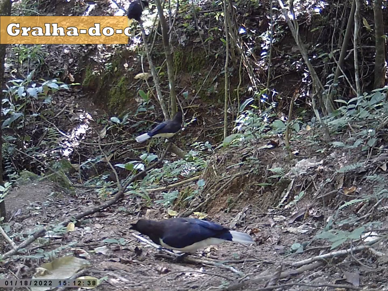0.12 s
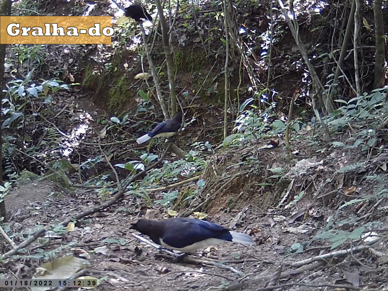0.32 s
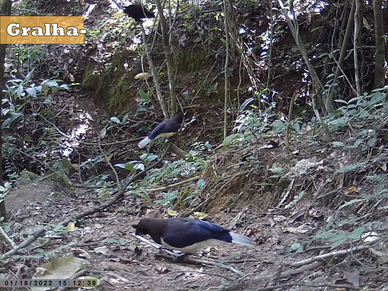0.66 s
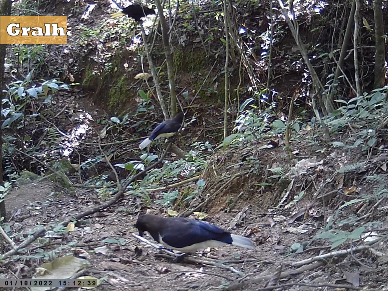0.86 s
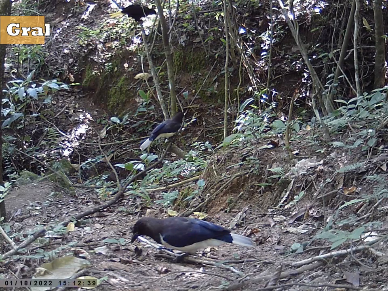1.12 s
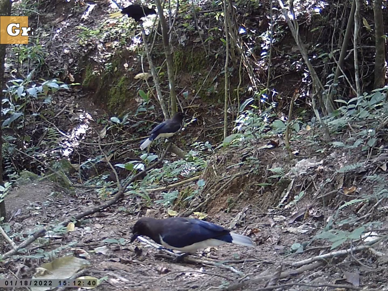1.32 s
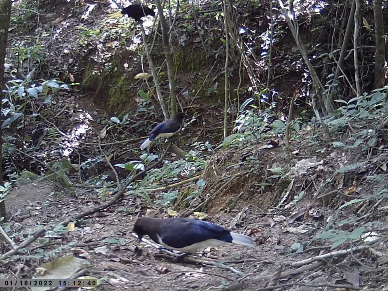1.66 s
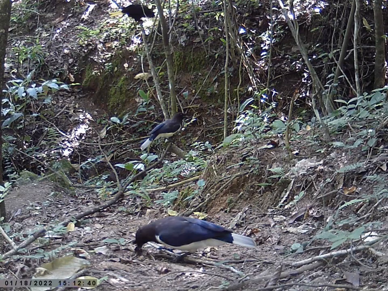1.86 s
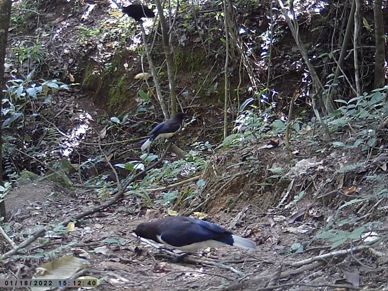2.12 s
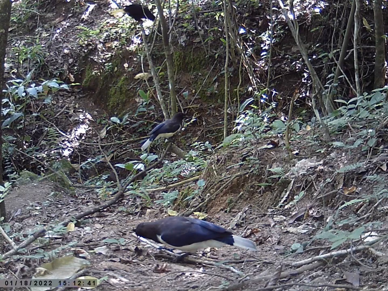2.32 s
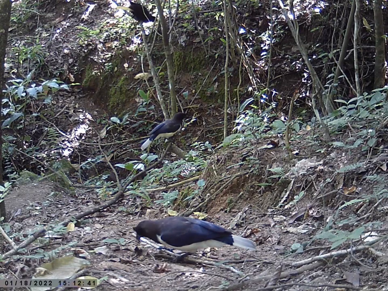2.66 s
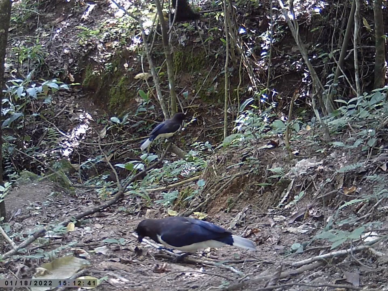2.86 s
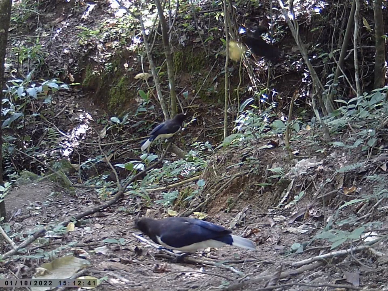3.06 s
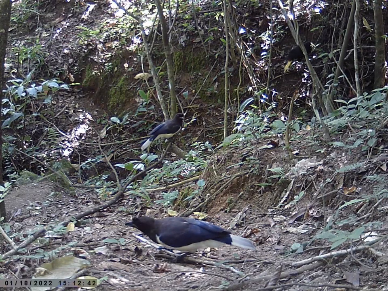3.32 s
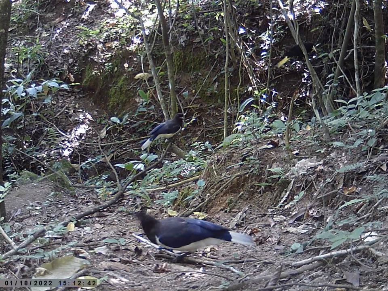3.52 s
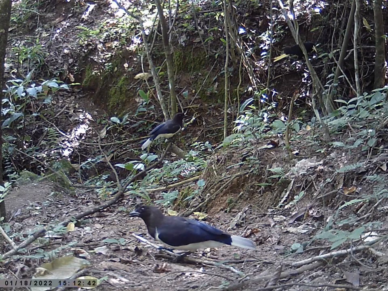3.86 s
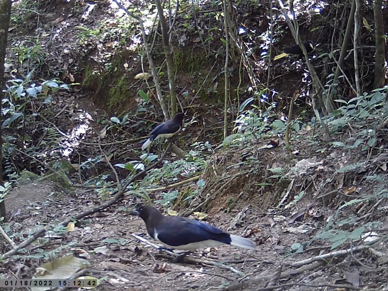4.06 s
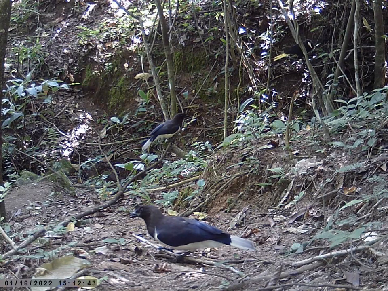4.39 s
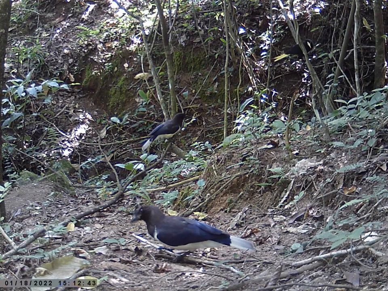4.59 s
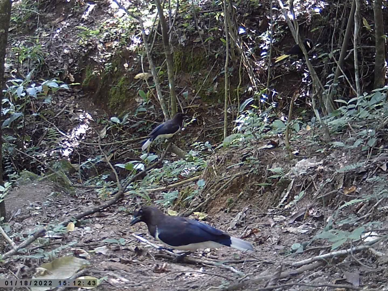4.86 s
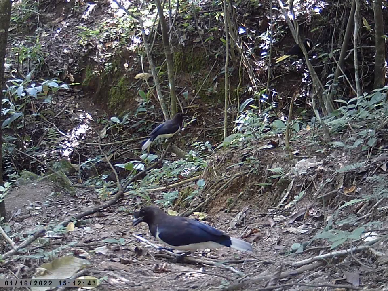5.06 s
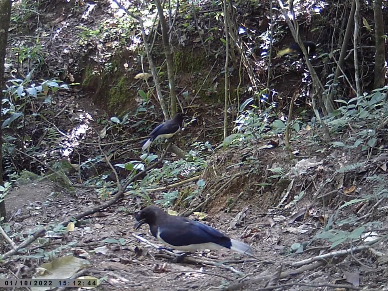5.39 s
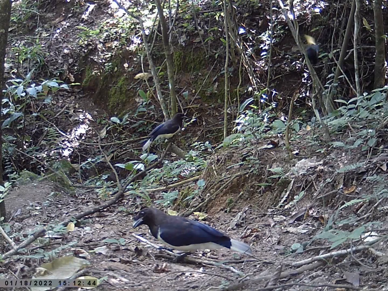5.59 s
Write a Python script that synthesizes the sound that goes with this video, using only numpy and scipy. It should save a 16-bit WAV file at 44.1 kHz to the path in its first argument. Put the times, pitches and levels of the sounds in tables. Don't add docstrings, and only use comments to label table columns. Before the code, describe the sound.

In a quiet wood, a jay faintly rustles dry leaves while distant birds chirp and rasp over a thin insect trill. At about three seconds another bird takes off and flaps past, its feathery swishes and soft thumps growing strongest just after four seconds. Its draught then buffets the small camera microphone with low rumbling bumps, while a few twigs tick near the end.

```python
import sys
import numpy as np
from scipy import signal
from scipy.fft import rfft, irfft, next_fast_len
from scipy.io import wavfile
from scipy.ndimage import uniform_filter1d

SR = 44100
rng = np.random.default_rng(int(sys.argv[2]) if len(sys.argv) > 2 else 0)


def pcm_store(signal):
    levels = np.round(np.clip(np.atleast_2d(signal), -1, 1) * 32767)
    wavfile.write(sys.argv[1], SR, levels.astype(np.int16).T)


def volts_from_decibels(level):
    exponent = np.asarray(level, float) / 20
    return 10 ** exponent


N = 251810


def unit(x):
    return x / np.sqrt(np.mean(x ** 2))


def shaped(x, gain):
    size = next_fast_len(len(x))
    hz = np.arange(size // 2 + 1) * SR / size + 1e-3
    return irfft(rfft(x, size) * gain(hz), size)[:len(x)]


def hump(hz, width):
    return lambda f: 1 / (1 + ((f * f - hz * hz) / (f * width)) ** 2)


def walk(rate, size=N):
    hold = max(int(SR / rate), 16)
    levels = rng.standard_normal(size // 16 + 1)[:size // hold + 1]
    return unit(uniform_filter1d(np.repeat(levels, hold), hold)[:size])


def even(x, span):
    power = uniform_filter1d(x ** 2, int(span * SR))
    return x / np.sqrt(power + .05 * np.mean(x ** 2))


def add(out, s, x):
    i = int(s * SR)
    out[i:i + len(x)] += x[:len(out) - i]


def curve(table):
    return np.interp(np.arange(N) / SR, *np.transpose(table), left=-120)


def puff(gain, rise, length, crackle_db, size=8192):
    t = np.arange(size) / SR
    swell = (1 - np.exp(-t / rise)) * np.exp(-(t / length) ** 1.3)
    grains = rng.standard_normal(size) * volts_from_decibels(crackle_db * walk(700, size=size))
    return unit(shaped(grains, gain) * swell) * np.sqrt(np.mean(swell ** 2))


# centre_hz [Hz], width_hz [Hz], level_db [dB]
FEATHER_BANDS = [(6800, 3100, 1), (8900, 8100, -6), (3500, 4500, -2)]


def feathers(f):
    return sum(volts_from_decibels(db) * hump(hz, width)(f) for hz, width, db in FEATHER_BANDS)


# start_s [s], swish_peak_db [dB], thump_db [dB re swish], thump_hz [Hz], swish_length_s [s]
HARD_STROKES = [
    (3.223, -36.5, -18, 334, 0.023),
    (3.304, -40, -28, 425, 0.015),
    (3.5705, -31.5, -9.5, 764, 0.018),
    (3.651, -36, -8.5, 434, 0.042),
    (3.7064, -40, -25, 323, .014),
    (3.927, -34, -6.5, 347, 0.026),
    (4.0135, -31.5, -5, 425, .028),
    (4.0961, -28.5, -3.5, 554, .026),
    (4.19, -35.5, -2.5, 315, .033),
]
SOFT_STROKES = [
    (2.9352, -33.5, -19, 455, 0.015),
    (3.0019, -37.5, -27, 428, 0.076),
    (3.1193, -36.5, -16, 616, 0.016),
    (3.3693, -36, -5, 308, .025),
    (3.4767, -36, -21, 420, .026),
    (4.2494, -42, -2.5, 690, 0.028),
    (4.2984, -41.5, -4.5, 324, 0.029),
    (4.4052, -36, -14, 473, 0.031),
    (4.4974, -33.5, -8.5, 700, .02),
]
SNAP_DB, SOFT_SNAP_DB = -8, -10.5
SNAP_HZ = 1940
WASH_HZ, WASH_DB = 189, -4.5


def strokes(table, rise, snap_db):
    out = np.zeros(N)
    for s, db, thump_db, thump_hz, length in table:
        swish = puff(feathers, rise, length, 2.6)
        snap = puff(hump(SNAP_HZ, 2300), rise, 0.69 * length, 3)
        thump = puff(hump(thump_hz, 440), rise + 0.00065, 0.58 * length, 0.61)
        wash = puff(hump(WASH_HZ, 207), 0.0041, length, .5)
        add(out, s, volts_from_decibels(db - 13.5) * swish)
        add(out, s, volts_from_decibels(db + snap_db - 9.5) * snap)
        add(out, s, volts_from_decibels(db + thump_db - 5.5) * thump)
        add(out, s, volts_from_decibels(db + thump_db + WASH_DB - 6.0) * wash)
    return out


# time_s [s], level_db [dB]
NEARNESS = [(2.8, -82), (2.86, -65), (3.03, -59.5), (3.29, -65), (3.39, -55), (3.43, -61), (3.5, -53),
            (3.64, -53), (3.73, -61.5),
            (3.87, -64), (3.93, -52.5), (4.08, -50.5), (4.15, -56), (4.62, -61.5), (4.7, -58), (5.27, -62),
        (5.32, -68.5), (5.5, -63)]
BODY_DB, BODY_PER_DB = -3, 0.27
GONE_S, WAKE_GRAIN = 4.56, .35


def glide():
    db = curve(NEARNESS)
    low_db = BODY_DB + BODY_PER_DB * (db + 60.5)
    near = np.where(np.arange(N) < GONE_S * SR, 1, WAKE_GRAIN)
    grain_db = near * (3.0 * walk(500) + 2.17 * walk(45))
    grains = rng.standard_normal((2, N)) * volts_from_decibels(grain_db)
    unzips = rng.random(N) < 120 / SR
    barbs = unzips * rng.standard_normal(N) * volts_from_decibels(11.5) * near
    high = unit(shaped(grains[0] + barbs, feathers))
    low = unit(shaped(grains[1], hump(520, 3200)))
    return volts_from_decibels(db - 2.0) * (high + volts_from_decibels(low_db - 2) * low)


# time_s [s], level_db [dB]
CALM = [(0, -62), (.8, -60), (1.3, -63.5), (1.75, -59.5), (2.3, -62.5), (2.9, -60.5), (3.12, -54),
        (3.3, -62)]
# peak_s [s], level_db [dB], build_s [s], fast_eddies_db [dB re level]
GUSTS = [(3.385, -46.5, 0.038, -1), (3.62, -36.5, 0.098, -9.5), (3.93, -39.5, 0.022, -5),
         (4.08, -27.5, 0.12, -14.5), (4.18, -32, 0.044, -12), (4.28, -34.5, 0.058, -9),
         (4.511, -33.5, 0.11, -30), (4.74, -26.5, 0.038, -6), (4.84, -29.5, 0.053, -1),
         (4.93, -32.5, 0.073, 1), (5.159, -32, 0.074, -11.5), (5.44, -31, 0.034, -25),
         (5.56, -39, .06, -22.5), (5.7, -42.5, 0.035, -25)]
GUST_FALL_SHARE = 0.73


def gusts():
    t = np.arange(N) / SR
    slow = volts_from_decibels(curve(CALM))
    fast = slow * volts_from_decibels(-0.8)
    for s, db, build, fast_db in GUSTS:
        rise_or_fall = np.minimum((t - s) / build, (s - t) / (GUST_FALL_SHARE * build))
        swell = volts_from_decibels(db) * np.exp(rise_or_fall)
        slow = np.hypot(slow, swell)
        fast = np.hypot(fast, swell * volts_from_decibels(fast_db))
    return slow, fast


# centre_s [s], peak_db [dB], pitch_hz [Hz], push [1 push, -1 pull]
EDDIES = [(4.07, -20, 31.8, -1), (4.159, -22, 45.6, -1), (4.268, -29.5, 39, -1), (4.518, -32, 34.6, 1),
          (4.718, -13, 40.3, 1), (4.732, -23.5, 60, -1), (4.738, -20.5, 128, 1), (4.75, -10.5, 59.4, 1),
          (4.774, -20.5, 25, -1), (4.817, -21, 50, 1), (4.887, -21.5, 69, -1), (4.901, -18.5, 70, -1),
          (4.934, -23, 100, -1), (4.966, -23.5, 68.5, 1), (5.119, -28, 61, -1), (5.151, -21, 75, -1),
          (5.173, -25.5, 44.5, -1), (5.435, -25, 50, 1), (5.449, -27, 48, -1)]


def draught():
    slow_gain, fast_gain = gusts()
    slow, fast = rng.standard_normal((2, N))
    out = volts_from_decibels(1.0) * slow_gain * even(shaped(slow, hump(15.3, 22.3)), 0.125)
    out += volts_from_decibels(-5.5) * fast_gain * even(shaped(fast, lambda f: hump(78, 95)(f) ** 1.69), 0.062)
    for s, peak_db, hz, push in EDDIES:
        u = 2.0 * hz * np.arange(-4096, 4096) / SR
        vortex = (1 - 3 * u ** 2) / (1 + u ** 2) ** 3
        add(out, s - 4096 / SR, np.sign(push) * volts_from_decibels(peak_db) * vortex)
    return out


# start_s [s], rms_db [dB], centre_hz [Hz], length_s [s]
RUSTLES = [(.081, -61.5, 6400, .03), (.251, -63.5, 5440, 0.12), (.279, -59.5, 5170, .035),
           (.373, -60, 4800, .025), (.515, -57, 6400, 0.033), (.525, -62, 3180, 0.026),
           (.622, -59, 6200, 0.03), (.667, -63.5, 5470, 0.048), (1.026, -62, 9000, .015),
           (1.095, -62, 6800, .018), (1.42, -63, 6500, .013), (1.723, -60, 6300, 0.03),
           (1.929, -59, 3870, 0.025), (2.225, -66, 5000, .01), (4.902, -60.5, 3500, 0.015),
           (4.991, -65, 2800, 0.024)]
BRUSHES = [(2.876, -54, 3120, 0.015), (2.885, -60, 7000, .015), (3.033, -48.5, 6700, .01),
           (3.447, -54.5, 6960, .01), (3.6, -54, 7440, 0.032), (3.657, -54.5, 1500, 0.01),
           (3.815, -60, 5050, 0.013), (3.893, -54.5, 7500, 0.012), (3.948, -52.5, 7400, .032),
           (3.987, -51.5, 7360, .017), (4.033, -48.5, 7000, 0.027), (4.07, -54, 7000, 0.013),
           (4.156, -53.5, 7000, 0.018)]
# start_s [s], rms_db [dB], centre_hz [Hz]
TICKS = [(.182, -61, 6500), (2.832, -54, 3560), (2.9, -62, 3500), (2.982, -59, 2200), (3.213, -54, 5000),
         (3.2256, -49, 4500), (3.234, -56, 7000), (3.304, -51, 9000), (3.315, -62, 5000), (3.46, -60, 7550),
         (4.713, -57, 6040), (5.052, -52, 6900), (5.069, -50.5, 7700), (5.455, -58, 6000),
         (5.269, -55, 6100), (5.5475, -52, 6700), (5.565, -65, 7500), (5.6, -47.5, 6840),
         (5.615, -48.5, 6500)]
# start_s [s], rms_db [dB], centre_hz [Hz]
QUILLS = [
    (3.2282, -39, 6900),
    (3.5728, -44, 2580),
    (3.66, -48, 4000),
    (3.9365, -47, 3500),
    (4.0239, -46, 3000),
    (4.1105, -43, 3000),
    (4.507, -53, 3000),
]
TICK_S, QUILL_S = 0.0049, 0.0019
LEAF_CRACKLE_DB, BRUSH_CRACKLE_DB, TICK_CRACKLE_DB = 3, 2, 5.5
SPREAD = 0.72


def leaves(table, crackle_db):
    out = np.zeros(N)
    for s, db, hz, length in table:
        crackle = puff(hump(hz, SPREAD * hz), .13 * length, length, crackle_db)
        add(out, s, volts_from_decibels(db + 3.5) * crackle)
    return out


# start_s [s], length_s [s], start_hz [Hz], end_hz [Hz], rms_db [dB]
WHISTLES = [(.28, 0.042, 3350, 3500, -68), (.275, .024, 2940, 2760, -67), (.355, 0.065, 2750, 2480, -68),
            (.44, .07, 2470, 2250, -78), (.793, 0.046, 3110, 3045, -66), (.83, .065, 3070, 2720, -66),
            (1.42, 0.042, 3170, 2840, -72), (1.615, .018, 5070, 4800, -67), (1.665, .045, 4600, 3900, -75),
            (1.975, 0.1, 2650, 2600, -66), (2.089, .071, 2580, 2480, -68.5),
            (2.173, .022, 2590, 2540, -68.5), (5.125, .03, 3700, 2730, -68), (5.092, .02, 3680, 3000, -70),
            (5.183, .027, 3950, 3100, -68), (5.035, .042, 4810, 2750, -64), (5.25, .035, 2680, 2660, -66.5)]
SWOOPS = [
    (.078, .054, 3090, 3295, -65),
    (.075, .05, 4320, 4600, -66.5),
    (.235, .039, 7260, 7500, -63.5),
    (.475, .04, 4520, 3740, -71),
    (.876, .145, 4900, 3700, -68.5),
    (1.252, .15, 6100, 3550, -70),
]
RASPS = [(.27, .07, 5400, 5200, -59.5), (.25, .07, 5700, 5650, -65), (.3, .06, 4900, 4700, -65),
         (.47, .11, 5000, 4750, -77), (.22, 0.072, 4600, 5000, -66), (.615, .06, 6400, 5400, -65),
         (.885, .077, 2800, 2250, -68), (3.0, 0.032, 6320, 7360, -55), (3.01, .038, 8400, 8500, -60),
         (3.02, .043, 1700, 1454, -64.5), (.87, .11, 2960, 2600, -73), (4.24, 0.044, 726, 595, -58.5),
         (4.955, .08, 6100, 6000, -62)]
RASP_SWOOPS = [
    (.235, .12, 5100, 6300, -63),
    (4.255, 0.16, 4990, 2856, -61),
    (4.58, .23, 5100, 2800, -62.5),
]
SLUR_BEND, SWOOP_BEND, RASP_BEND = 1.05, 3.3, 2.4
SWOOP_FADE_DB = -5


def birds(notes, wobble, flutter_db, bend, fade_db=0):
    out = np.zeros(N)
    for s, length, start_hz, end_hz, db in notes:
        u = np.linspace(0, 1, int(length * SR))
        pitch = walk(300, size=12000)[:len(u)]
        level = walk(70, size=12000)[:len(u)]
        left = (1 - u) ** bend
        hz = (end_hz + (start_hz - end_hz) * left) * (1 + wobble * pitch)
        swell = np.sin(np.pi * u) ** .35 * volts_from_decibels(db + fade_db * u + flutter_db * level)
        add(out, s, swell * np.sin(2 * np.pi * np.cumsum(hz) / SR))
    return out


# pitch_hz [Hz], ring_s [s], pulse_rate_hz [pulses a second], rms_db [dB], singers [count]
INSECTS = [
    (6560, 0.036, 48.5, -71, 2),
    (6850, 0.042, 20, -90, 2),
    (6540, 0.0055, 93, -93, 2),
    (8560, 0.0028, 59, -72.5, 3),
    (9065, 0.012, 55, -73.5, 2),
]
# time_s [s], level_db [dB]
CHORUS = [(0, -72.5), (.57, -70.5), (1.14, -73), (2.81, -71.5), (3.56, -70.5), (4.07, -67), (4.2, -69),
          (5.06, -67), (5.3, -70)]


def insects():
    out, t = 0, np.arange(N) / SR
    swell_db = curve(CHORUS)
    swell_db = swell_db - np.median(swell_db)
    for hz, ring, rate, db, singers in INSECTS:
        choir = 0
        for k in range(int(round(singers))):
            pulse_hz = rate * (1 + 0.0123 * k + 0.00894 * walk(2.48))
            beat = np.cumsum(pulse_hz) / SR + rng.random()
            gate = np.exp(0.37 * np.cos(2 * np.pi * beat)) * volts_from_decibels(2.1 * walk(5.4))
            tone = np.sin(2 * np.pi * hz * (1 + .004 * k) * t + 1.3 * walk(40))
            scrape = unit(shaped(rng.standard_normal(N), hump(hz, 3.0 / ring)))
            choir = choir + gate * (tone + scrape)
        out = out + volts_from_decibels(db + swell_db) * unit(choir)
    return out


TREES_T60_S, TREES_DB = .4, -12
FAR_T60_S, FAR_DB = .38, -3


def trunks(x, t60, db):
    t = np.arange(SR // 2) / SR
    tail = rng.standard_normal(len(t)) * volts_from_decibels(-60 * t / t60) * (t > .006)
    tail = tail / np.sqrt(np.sum(tail ** 2))
    return x + volts_from_decibels(db) * signal.fftconvolve(x, tail)[:N]


# pitch_hz [Hz], density_db [dB per Hz]
HUSH_SPECTRUM = [(65, -21), (110, -4.5), (303, -9), (414, -11.5), (565, -11.5), (724, -15), (3020, -19),
                 (5870, -18.5), (6640, -9), (7370, -18), (8880, -22.5), (15500, -26.5)]
HUSH_DB = -64


def wood():
    hz, db = np.transpose(HUSH_SPECTRUM)
    spectrum = lambda f: volts_from_decibels(np.interp(np.log(f), np.log(hz), db))
    hush = volts_from_decibels(HUSH_DB) * unit(shaped(rng.standard_normal(N), spectrum))
    bass = shaped(hush, lambda f: 1 / (1 + (f / 400) ** 4))
    return hush + bass * (volts_from_decibels(2.9 * walk(15)) - 1)


BUZZ_HZ, BUZZ_BAND_HZ, BUZZ_DB = 94.5, 13200, -78


def buzz():
    gate = np.exp(1.9 * np.cos(2 * np.pi * BUZZ_HZ * np.arange(N) / SR))
    hiss = shaped(rng.standard_normal(N), hump(BUZZ_BAND_HZ, 5000))
    return volts_from_decibels(BUZZ_DB) * unit(gate * hiss)


AIR_HZ = 10650


def scene():
    wings = strokes(HARD_STROKES, .0022, SNAP_DB) + strokes(SOFT_STROKES, 0.012, SOFT_SNAP_DB) + glide()
    wings += leaves([(*row, QUILL_S) for row in QUILLS], 1.5)
    twigs = leaves([(*row, TICK_S) for row in TICKS], TICK_CRACKLE_DB)
    litter = leaves(RUSTLES, LEAF_CRACKLE_DB) + leaves(BRUSHES, BRUSH_CRACKLE_DB) + twigs
    near = shaped(wings + litter, lambda f: 1 / np.sqrt(1 + (f / AIR_HZ) ** 8))
    clear = birds(WHISTLES, .005, 1.6, SLUR_BEND) + birds(SWOOPS, .007, 1.6, SWOOP_BEND, SWOOP_FADE_DB)
    hoarse = birds(RASPS, .018, 2.5, SLUR_BEND) + birds(RASP_SWOOPS, .032, 2.5, RASP_BEND, SWOOP_FADE_DB)
    steady = insects() + draught() + wood() + buzz()
    mix = trunks(near, TREES_T60_S, TREES_DB) + trunks(clear + hoarse, FAR_T60_S, FAR_DB) + steady
    return mix[None]


def roll_off(x):
    return signal.sosfilt(signal.butter(12, 15680, fs=SR, output="sos"), x)


def record(dry):
    return roll_off(dry)


dry = scene()
out = record(dry)
pcm_store(out)
```